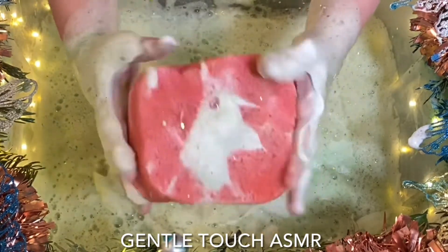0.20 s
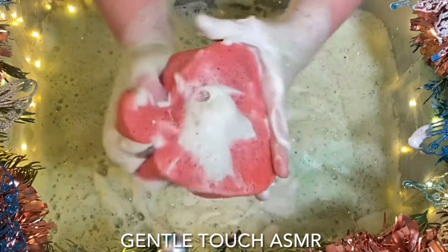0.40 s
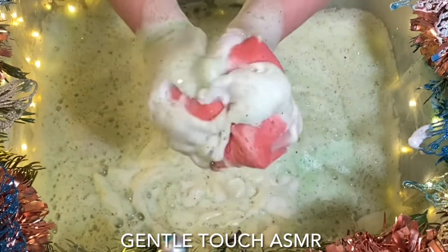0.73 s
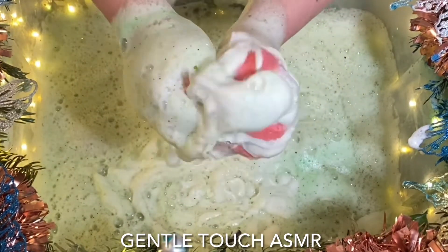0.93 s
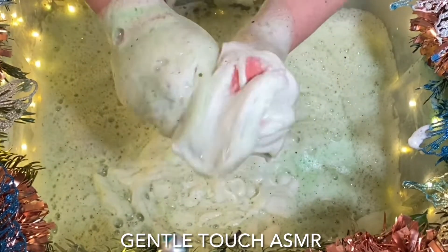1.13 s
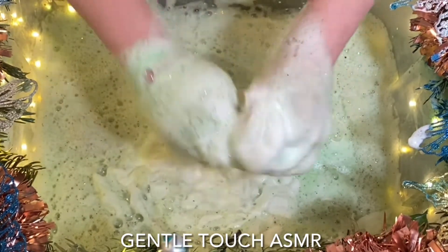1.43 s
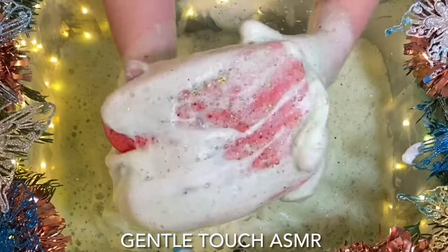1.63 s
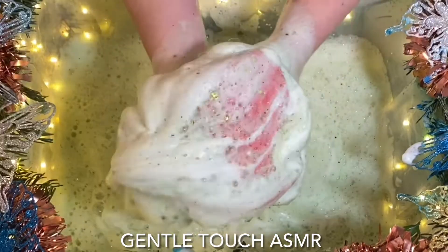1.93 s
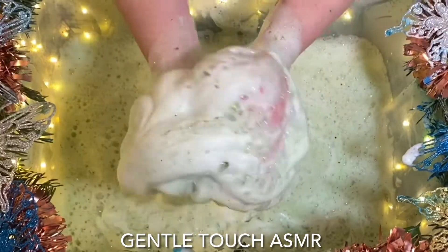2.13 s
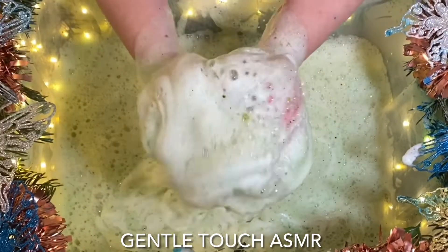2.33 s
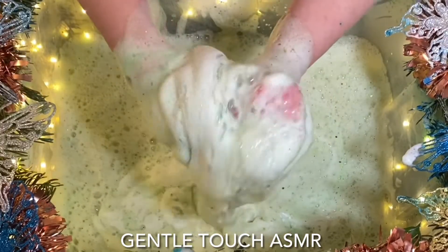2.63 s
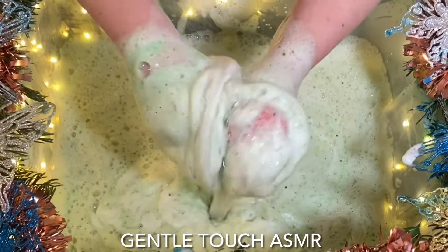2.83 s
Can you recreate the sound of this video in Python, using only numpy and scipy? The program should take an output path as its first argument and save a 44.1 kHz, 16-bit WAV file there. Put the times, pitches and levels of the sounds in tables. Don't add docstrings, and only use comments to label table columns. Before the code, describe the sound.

A foam-soaked sponge is squeezed over a basin, close and dry: faint ticks, a fizzing squelch, small wet smacks, a brief silence, then a second squelch with crackling films and one loud wet pop.

```python
import sys
import numpy as np
from scipy import signal
from scipy.fft import rfft, irfft, next_fast_len
from scipy.io import wavfile
from scipy.ndimage import map_coordinates

SR = 44100
rng = np.random.default_rng(int(sys.argv[2]) if len(sys.argv) > 2 else 0)


def dump_mix(stems):
    frames = np.atleast_2d(stems).T
    limited = np.clip(frames, -1, 1)
    pcm = np.round(limited * 32767).astype(np.int16)
    wavfile.write(sys.argv[1], SR, pcm)


def gain_from_db(level_db):
    decades = np.asarray(level_db, float) / 20
    return 10 ** decades


N = 132300

# (time [s], level [dB], pore pitch [Hz])
PORE_FLOW = [(0, -67, 1580), (.12, -69, 1510), (.23, -66.5, 1480), (.29, -50, 1600), (.43, -50.5, 1000),
             (.465, -45.5, 750), (.503, -46, 716), (.513, -57.5, 1270), (.85, -55.5, 1530), (1, -63, 1220),
             (1.35, -67, 1270), (1.46, -63, 1460), (1.63, -68, 1220), (1.68, -52, 985), (1.8, -51, 1140),
             (1.88, -44.5, 1430), (1.95, -49.5, 1130), (2.1, -57.5, 960), (2.25, -53.5, 1400),
             (2.4, -59, 1020), (2.55, -63, 1240), (3, -66, 1500)]


def unit(x):
    return x / np.sqrt(np.mean(x ** 2) + 1e-20)


def curves(rows):
    times, *columns = np.transpose(rows)
    return [np.interp(np.arange(N) / SR, times, column) for column in columns]


def wobble(rate):
    knots = rng.standard_normal(int(N * rate / SR) + 4)
    return map_coordinates(knots, [np.arange(N) * rate / SR])


def unsteady(level_db, calm_db, wild_db):
    depth = np.interp(level_db, [wild_db, calm_db], [1.3, .45])
    swell_db = .5 * wobble(12) + 1.6 * wobble(40) + 1.4 * wobble(110)
    return gain_from_db(level_db + depth * swell_db)


def coloured(x, points):
    size = next_fast_len(N + 8192)
    hz, db = np.transpose(points)
    bins = np.fft.rfftfreq(size, 1 / SR)
    gain = gain_from_db(np.interp(np.log(bins + 1), np.log(hz), db))
    return irfft(rfft(x, size) * gain, size)[:N]


def bursts(s, hz, gain, cycles, rise, size, onset=3.73):
    u = np.arange(size) / SR * np.clip(hz, 50, .36 * SR)[:, None]
    swing = np.sin(2 * np.pi * u * (1 + rise * np.minimum(u / cycles, 2)))
    envelope = np.exp(-u / cycles) * (1 - np.exp(-u * onset))
    wave = gain[:, None] * swing * envelope
    wave *= np.hanning(2 * size)[size:] ** .5
    at = np.round(s * SR).astype(int)[:, None] + np.arange(size)
    return np.bincount(at.ravel(), wave.ravel(), N + SR)[:N]


def swarm(count, hz, spread, scatter_db, cycles, rise, size):
    s = rng.random(count) * (N - 1) / SR
    detune = np.exp(spread * rng.standard_normal(count))
    extra_db = scatter_db * np.minimum(rng.exponential(size=count), 3.5)
    sign = rng.choice([-1, 1], count)
    gain = sign * gain_from_db(extra_db) * np.sqrt(detune)
    return unit(bursts(s, hz[(s * SR).astype(int)] * detune, gain, cycles, rise, size))


def room():
    # (frequency [Hz], level [dB])
    room_tone = [(18, 2.5), (45, -4), (100, -4.5), (300, -14), (1000, -33), (5000, -24), (15700, -28.5)]
    return gain_from_db(-70) * unit(coloured(rng.standard_normal(N), room_tone))


def basin(x):
    t60, wet_db = 0.082, -11.5
    t = np.arange(SR // 8) / SR
    tail = rng.standard_normal(len(t)) * gain_from_db(-60 * t / t60) * (t > .001)
    return x + gain_from_db(wet_db) * signal.fftconvolve(x, tail / np.linalg.norm(tail))[:N]


def treble_peak(x):
    # (frequency [Hz], level [dB])
    treble_shape = [(100, 0), (10000, 1.5), (12500, 10), (15700, -14)]
    return coloured(x, treble_shape)


def dull(x):
    # (frequency [Hz], level [dB])
    film_loss = [(100, 0), (9000, 0), (12000, -4), (16000, -12)]
    return coloured(x, film_loss)


def drain():
    # (time [s], level [dB])
    suds_fall = [(0, -76.5), (.22, -81), (.3, -64), (.47, -53), (.57, -63.5), (1.1, -71.5), (1.3, -70.5),
                 (1.46, -66.5), (1.63, -78.5), (1.71, -63), (1.88, -57.5), (2.1, -68.5), (2.33, -59.5),
                 (2.55, -62), (2.68, -63.5), (2.73, -56.5), (2.79, -64.5), (3, -72)]
    # (frequency [Hz], level [dB])
    basin_ring = [(75, -49), (120, -3.5), (200, -7.5), (260, 0), (340, -9.5), (470, -2), (620, -12),
                  (1200, -22)]
    level_db, = curves(suds_fall)
    plops = swarm(count=900, hz=np.full(N, 300), spread=0.45, scatter_db=0.0, cycles=0.7, rise=0.04, size=900)
    return unsteady(level_db, -66.5, -63) * unit(coloured(plops, basin_ring))


def glugs():
    # (time [s], peak [dB], pitch [Hz])
    big_bubbles = [(1.148, -41, 335), (1.148, -47, 152), (1.153, -49, 455), (1.33, -55.5, 108),
                   (1.337, -48, 600), (1.329, -43, 800), (1.326, -46.5, 305), (1.394, -51.5, 265),
                   (1.566, -50.5, 240), (2.16, -43, 447), (2.483, -44.5, 438), (2.566, -43.5, 530),
                   (2.571, -42, 467), (2.72, -45.5, 252), (2.738, -48.5, 127)]
    s, db, hz = np.transpose(big_bubbles)
    return bursts(s, hz, -gain_from_db(db + 4.0), 0.75, 0.066, size=1800)


def ticks():
    # (time [s], peak [dB], centre [Hz])
    single_films = [(.006, -42, 4000), (.017, -44, 4000), (.032, -43, 9000), (.036, -45, 3500),
                    (.044, -50, 4000), (.093, -45, 4500), (.107, -51, 2500), (.149, -50, 7000),
                    (.157, -42, 8500), (.175, -52, 8000), (.181, -49, 9000), (.187, -42, 7000),
                    (.194, -50, 3500), (1.547, -47, 5000), (2.736, -47, 3000), (2.775, -49, 3000),
                    (1.633, -50, 5000), (2.581, -52, 10000), (2.583, -50, 10000)]
    s, db, hz = np.transpose(single_films)
    stray = swarm(count=150, hz=np.full(N, 5000), spread=.5, scatter_db=4, cycles=.4, rise=0, size=60)
    return bursts(s, hz, gain_from_db(db + 10), .4, 0, size=60, onset=6) + gain_from_db(-80) * stray


def spits(count=20):
    # (time [s], peak [dB], centre [Hz], length [s])
    torn_films = [(.963, -50, 5000, .004), (.9662, -45.5, 5040, 0.0016), (0.987, -48, 8000, .003),
                  (1.033, -51, 5000, 0.0025), (1.040, -46.5, 5540, .003), (1.0645, -53, 4500, 0.0019),
                  (1.074, -53, 9000, 0.0023), (1.078, -54, 7000, 0.0018), (1.096, -50, 4500, 0.0018),
                  (1.116, -52, 3970, .003), (1.128, -55, 4000, .003), (1.2022, -53, 2200, 0.0021),
                  (1.2711, -59, 3000, 0.0023), (1.296, -53, 3500, 0.0026), (1.327, -37.5, 5600, .008),
                  (1.334, -38, 7000, 0.0027), (1.336, -47, 3000, 0.0015), (1.347, -42, 4500, 0.0056),
                  (1.774, -47, 4000, 0.0022), (1.842, -43, 3000, 0.0016), (1.916, -35, 3030, 0.0027),
                  (1.948, -40, 3500, 0.0033), (1.956, -46, 3500, 0.0021), (2.047, -53, 5000, 0.0017),
                  (2.074, -41.5, 5530, 0.0019), (2.087, -48, 5000, 0.0016), (2.147, -53, 5000, 0.0021),
                  (2.16, -41, 5000, 0.0039), (2.173, -44, 5500, .002), (2.189, -40, 5000, .003),
                  (2.2094, -49, 5000, 0.0019), (2.214, -41, 5000, .002), (2.236, -45.5, 4000, 0.0032),
                  (2.242, -41, 7500, .002), (2.27, -43, 5500, 0.0017), (2.291, -47, 4000, 0.0021),
                  (2.316, -42, 6000, .002), (2.331, -50, 6000, 0.0037), (2.35, -59, 4500, 0.0025),
                  (2.3968, -40, 7000, .003), (2.483, -52, 3000, .003), (2.562, -48, 6000, 0.0047),
                  (2.566, -35, 6000, .009), (2.58, -48, 8000, .002)]
    s, db, hz, length = np.repeat(np.transpose(torn_films), count, 1)
    progress = (np.arange(len(s)) % count + rng.random(len(s))) / count
    detune, strength = rng.standard_normal((len(s), 2)).T
    start = s + length * progress ** 1.3
    gain = gain_from_db(db + 4.5 - 11 * progress) * strength
    return bursts(start, hz * np.exp(0.45 * detune), gain, 0.74, 0, size=50, onset=4.8)


def snaps():
    # (time [s], peak [dB], pitch [Hz])
    air_pockets = [(1.063, -35, 1500), (1.183, -38, 1600), (1.1137, -34, 2000), (1.1474, -41, 1100),
                   (2.5705, -38, 3400), (2.5745, -38, 3000), (1.125, -43, 2600), (1.066, -42, 2500),
                   (1.1523, -41, 650), (.9665, -36, 2000), (.9695, -42, 1700), (2.566, -31, 570),
                   (2.5693, -35, 900), (1.3325, -36, 1900), (1.9165, -28, 2300), (1.814, -24.5, 1350),
                   (1.834, -24, 1300), (1.877, -24, 2600), (1.885, -25, 1660), (1.89, -27, 1300),
                   (1.894, -23, 2500), (1.915, -29, 1200), (1.329, -25.5, 4240), (1.3305, -29, 2300),
                   (2.568, -34, 1080), (2.574, -34, 1900), (1.044, -40, 2600), (1.086, -43, 2500),
                   (1.11, -43, 2500), (1.203, -45, 1900), (2.561, -32, 2000)]
    s, db, hz = np.transpose(air_pockets)
    return bursts(s - 0.55 / hz, hz, gain_from_db(db + 12.0), 0.79, 0, size=200, onset=0.41)


def smacks(count=30):
    # (time [s], peak [dB], pitch [Hz], length [s])
    wet_smacks = [(.964, -39.5, 2130, 0.0073), (1.034, -55, 3450, 0.0028), (1.039, -49, 2700, 0.0054),
                  (1.062, -42, 2070, 0.0077), (1.083, -50, 2500, 0.0034), (1.11, -41.5, 2400, 0.0042),
                  (1.122, -46, 2450, 0.0038), (1.184, -55, 1610, 0.0025), (1.198, -58, 1900, .002),
                  (1.326, -35, 3140, 0.0061), (1.33, -37.5, 2600, 0.006), (1.42, -39, 2600, 0.0047),
                  (1.444, -35, 2780, 0.025), (1.553, -66, 2980, 0.0039), (1.615, -50, 1310, 0.0063),
                  (2.396, -40.5, 3000, 0.0039), (1.718, -38, 9000, 0.022), (1.728, -34, 9500, 0.025),
                  (2.587, -49, 1200, 0.0037), (2.713, -42.5, 1990, 0.013),
                  (2.56, -36, 1800, .004),
        (2.5675, -37, 1700, .008),
    ]
    s, db, hz, length = np.repeat(np.transpose(wet_smacks), count, 1)
    progress, pick = rng.random((len(s), 2)).T
    detune, strength = rng.standard_normal((len(s), 2)).T
    wide = np.where(pick < .6, .25, .9)
    pitch = hz * np.exp(wide * detune + 0.52 * (wide - .25))
    gain = gain_from_db(db - 6.6 * progress - 4.5 - 2.3 * wide) * strength
    return bursts(s + length * progress, pitch, gain, 0.98, 0, size=200)


def big_snap():
    # (time [s], peak [dB], pitch [Hz])
    burst_parts = [
        (2.5656, -12.5, 1900),
        (2.5657, -22.5, 9000),
        (2.5657, -28, 6000),
        (2.5662, -24, 2900),
    ]
    s, db, hz = np.transpose(burst_parts)
    return bursts(s - 0.49 / hz, hz, gain_from_db(db + 13.5), 0.56, 0, size=46, onset=0.37)


def crackle():
    level_db, hz = curves(PORE_FLOW)
    grown_db = level_db - 7 + .4 * np.minimum(level_db + 52, 0)
    pores = swarm(count=420, hz=1.5 * hz, spread=0.51, scatter_db=1.5, cycles=0.71, rise=0, size=120)
    return gain_from_db(grown_db) * pores


def squelch():
    level_db, hz = curves(PORE_FLOW)
    pops = swarm(count=7000, hz=hz, spread=0.42, scatter_db=1.5, cycles=1.02, rise=0.04, size=330)
    return unsteady(level_db - 1.08, -52, -67.0) * pops


def fizz():
    # (time [s], level [dB], tilt [dB per octave], 0 and above bright, -6 and below thick)
    squeeze = [(0, -63, -3), (.12, -72, 0), (.235, -56.5, -8), (.27, -46.5, 3), (.45, -45.5, -2),
               (.84, -54.5, -0.5), (.96, -64.5, -0.5), (1.17, -71.5, -0.5), (1.28, -63, 11),
               (1.46, -57.5, -1), (1.64, -61, -4), (1.73, -51.5, -1.5), (1.92, -49.5, -4), (2.3, -57, -4.5),
               (2.52, -61.5, -1.5), (2.72, -59.5, -3.5), (2.8, -66.5, -4.5), (3, -63.5, -0.5)]
    # (frequency [Hz], level [dB])
    foam = [(300, -57), (900, -8.5), (2500, -1.5), (5000, -3), (8000, -2.5), (10500, -1), (13000, -6),
            (15700, -10.5)]
    level_db, tilt = curves(squeeze)
    films = swarm(count=24000, hz=np.full(N, 5000), spread=0.69, scatter_db=1.0, cycles=0.63, rise=0, size=40)
    hiss = gain_from_db(-3) * rng.standard_normal(N)
    white = coloured(films, [(500, -1.2), (4000, 1.9), (15000, 1.5)]) + hiss
    bright = unit(coloured(white, foam))
    thick = unit(coloured(white, [(f, db - 6 * np.log2(f / 4000)) for f, db in foam]))
    share = np.clip(-tilt / 6, 0, 1)
    return unsteady(level_db, -61.0, -59.5) * ((1 - share) * bright + share * thick)


def scene():
    background = room() + drain() + glugs()
    in_basin = basin(ticks() + treble_peak(snaps() + smacks()) + squelch())
    torn = dull(spits() + big_snap())
    mono = background + in_basin + torn + crackle() + fizz()
    return np.array([mono, mono])


def band_limit(x):
    return signal.sosfilt(signal.butter(12, 15775, fs=SR, output="sos"), x)


def record(dry):
    change_s, fade_out_s, fade_in_s, top_hz = 1.516, .036, .026, 15780
    t = np.arange(N) / SR - change_s
    faded = dry * np.clip(np.maximum(-t / fade_out_s, t / fade_in_s), 0, 1)
    passed = np.fft.rfftfreq(N, 1 / SR) < top_hz
    return band_limit(irfft(rfft(faded) * passed, N))


dry = scene()
out = record(dry)
dump_mix(out)
```